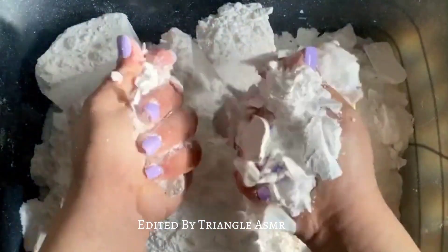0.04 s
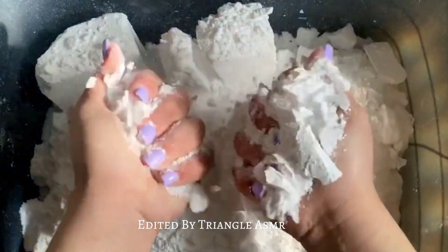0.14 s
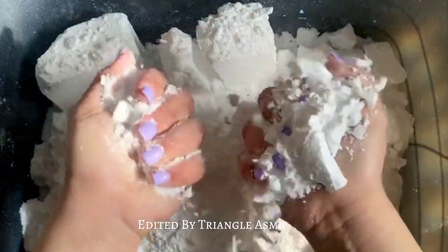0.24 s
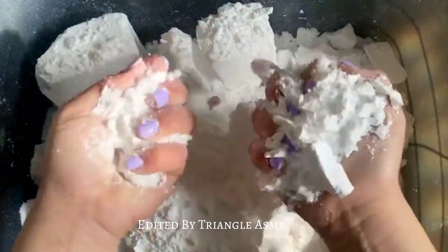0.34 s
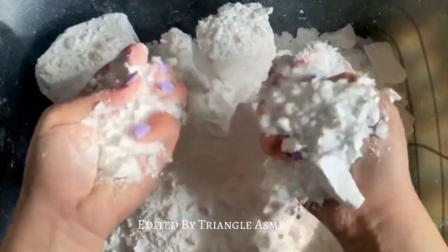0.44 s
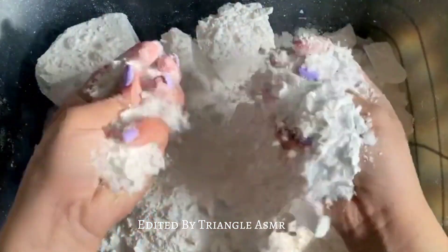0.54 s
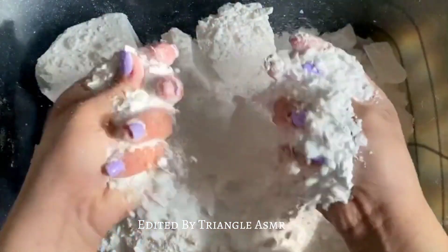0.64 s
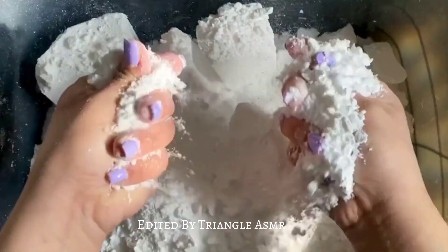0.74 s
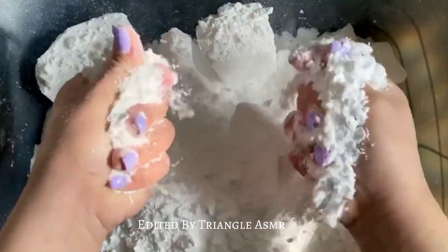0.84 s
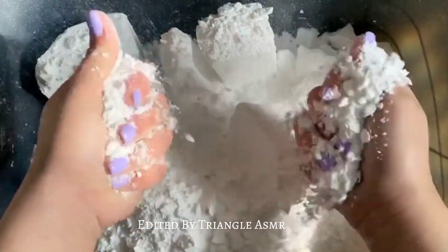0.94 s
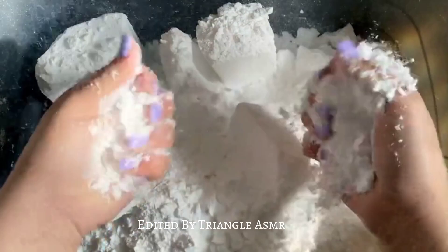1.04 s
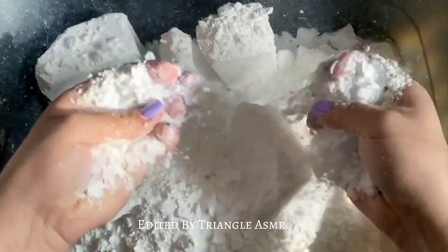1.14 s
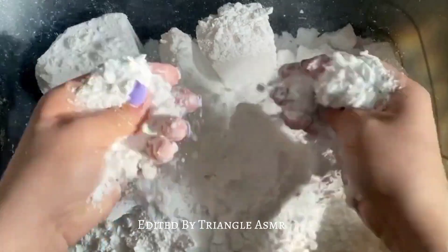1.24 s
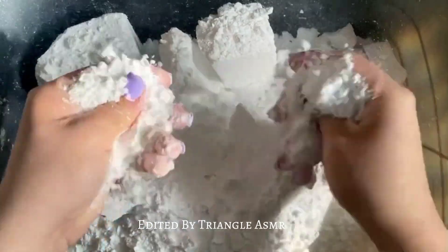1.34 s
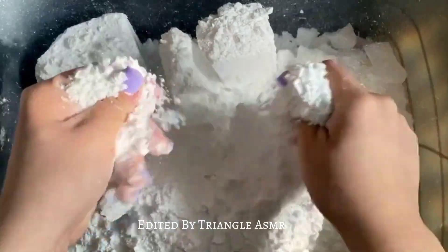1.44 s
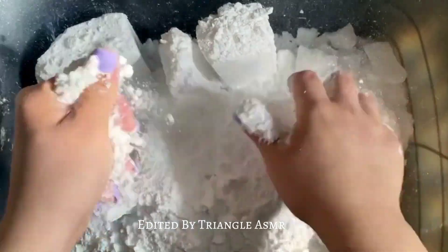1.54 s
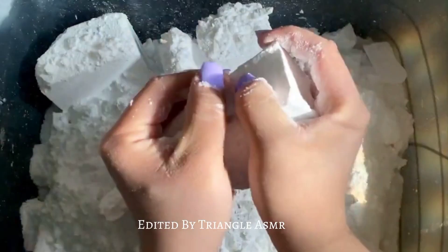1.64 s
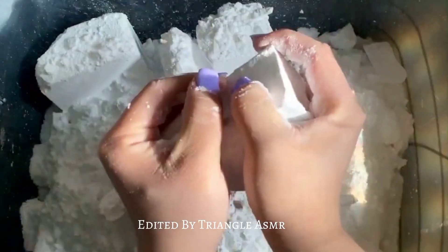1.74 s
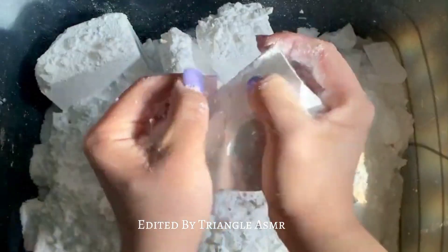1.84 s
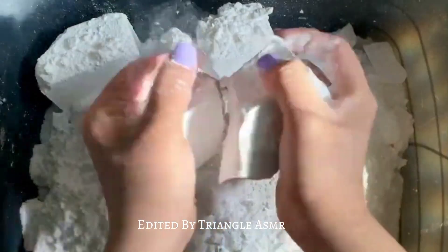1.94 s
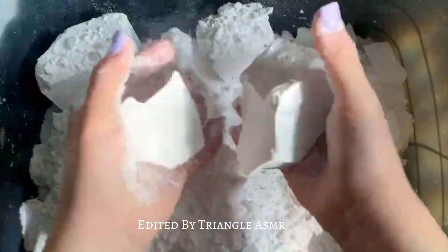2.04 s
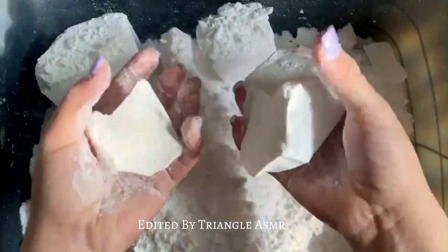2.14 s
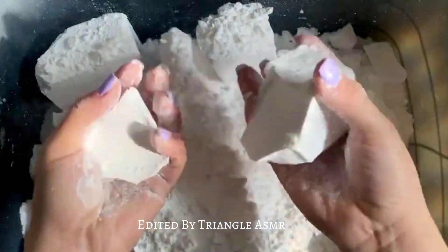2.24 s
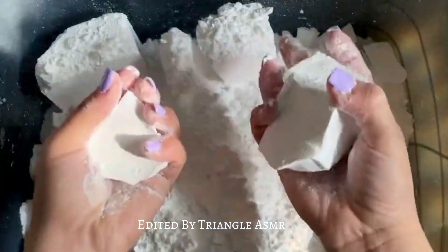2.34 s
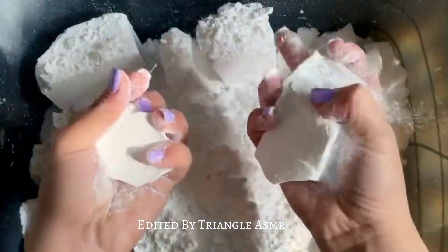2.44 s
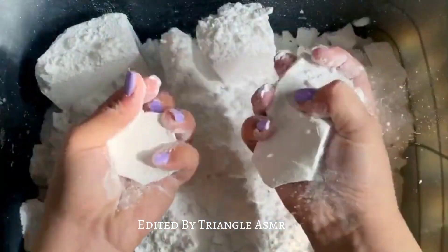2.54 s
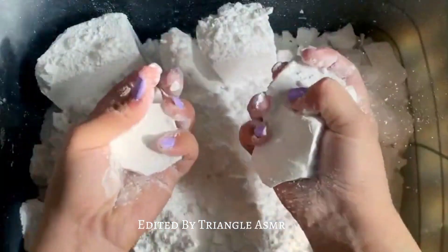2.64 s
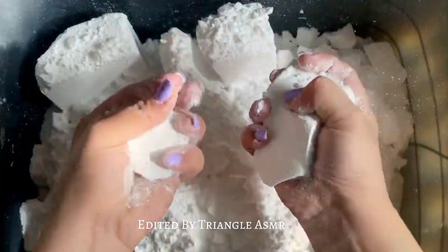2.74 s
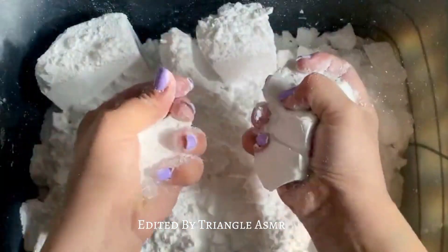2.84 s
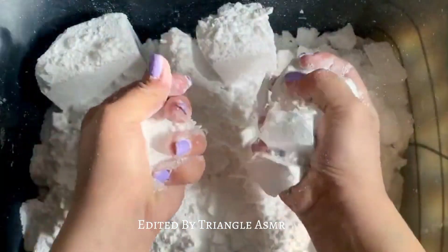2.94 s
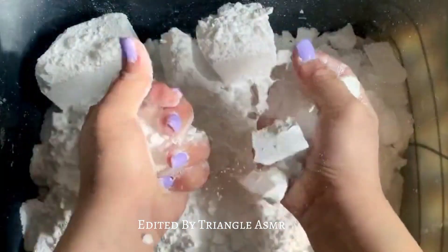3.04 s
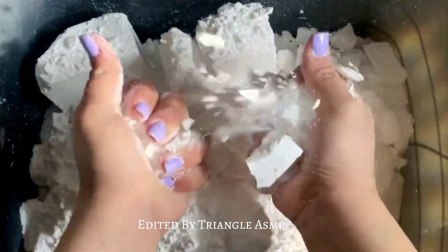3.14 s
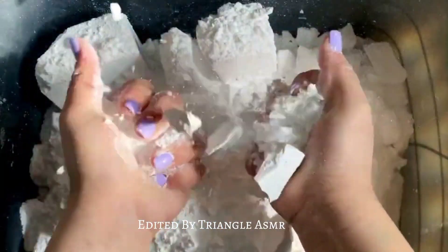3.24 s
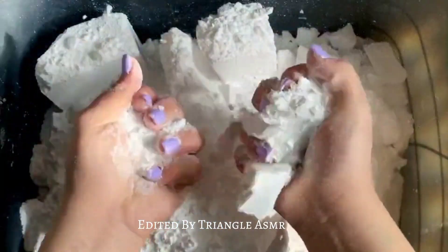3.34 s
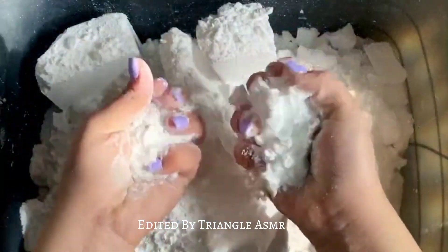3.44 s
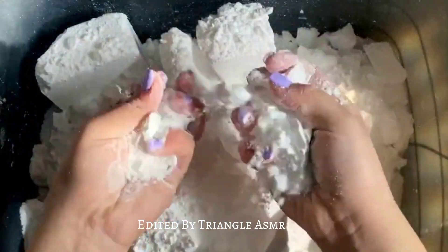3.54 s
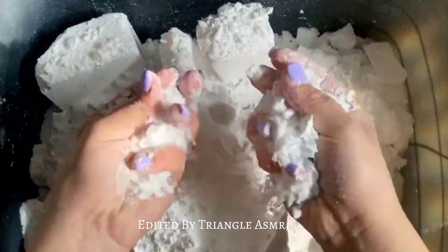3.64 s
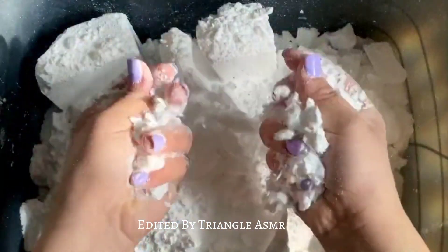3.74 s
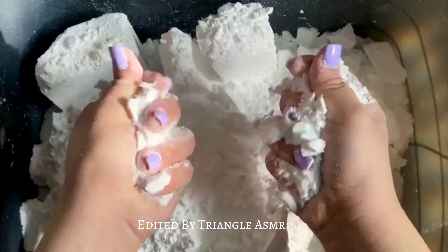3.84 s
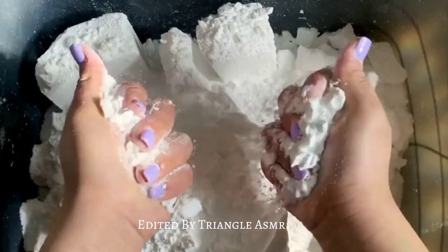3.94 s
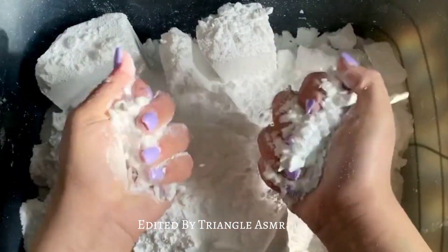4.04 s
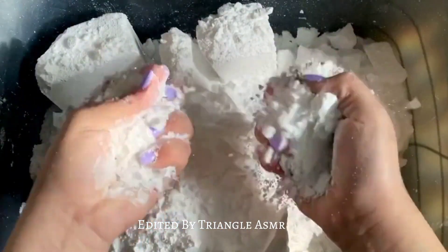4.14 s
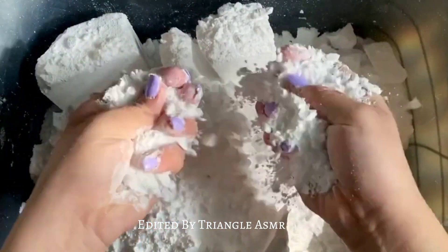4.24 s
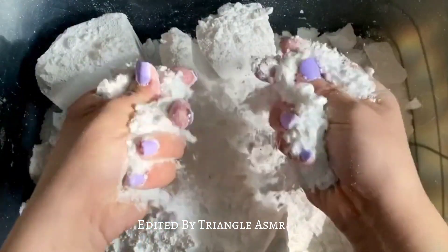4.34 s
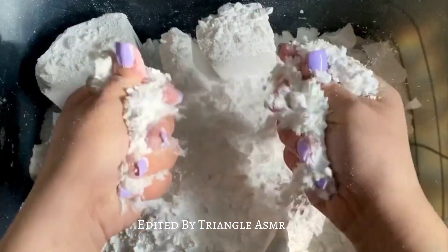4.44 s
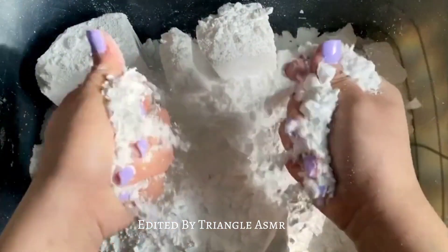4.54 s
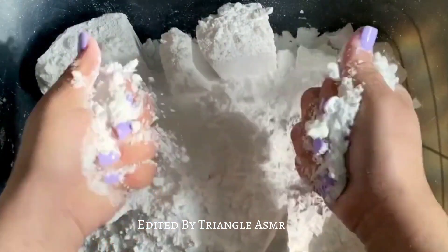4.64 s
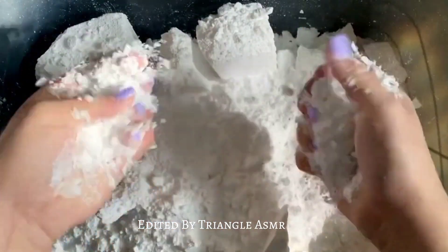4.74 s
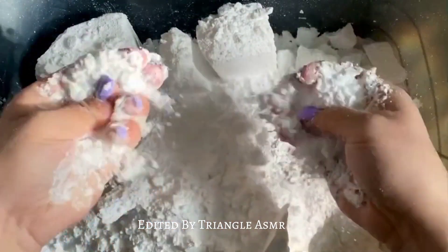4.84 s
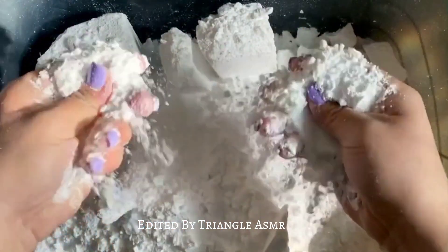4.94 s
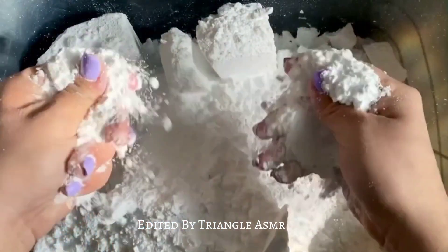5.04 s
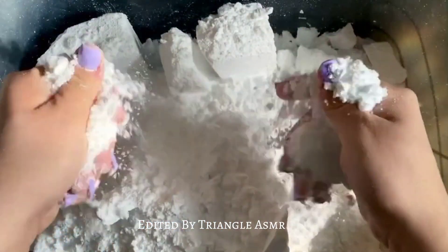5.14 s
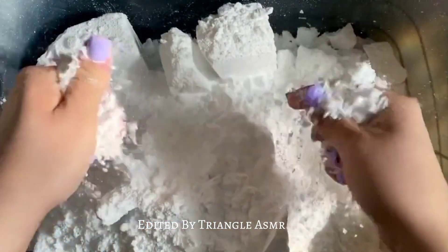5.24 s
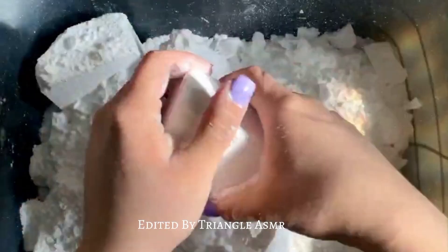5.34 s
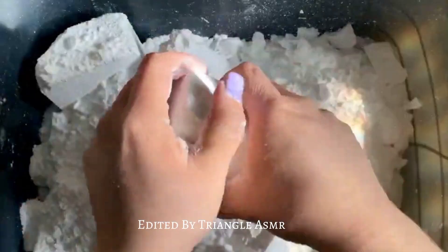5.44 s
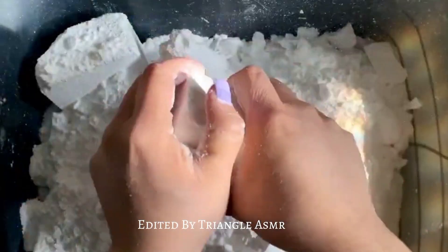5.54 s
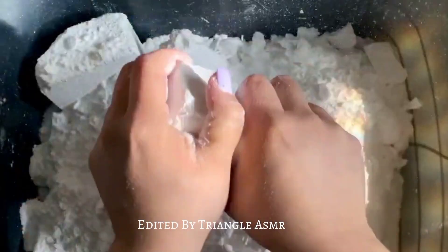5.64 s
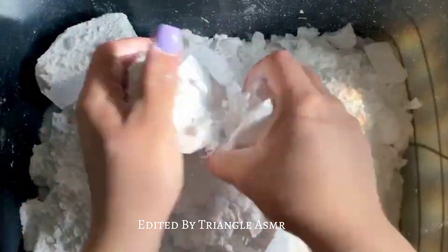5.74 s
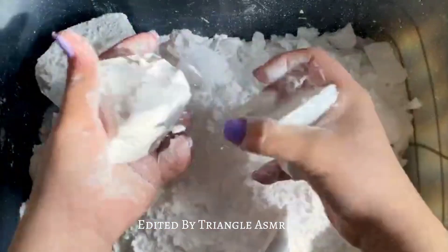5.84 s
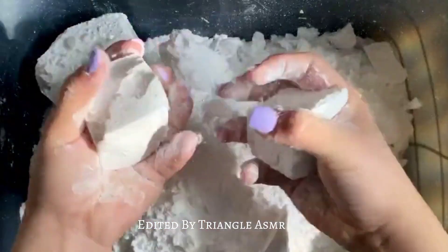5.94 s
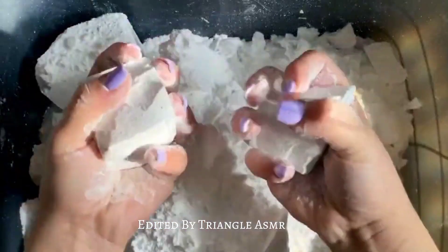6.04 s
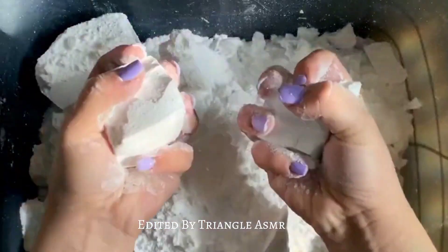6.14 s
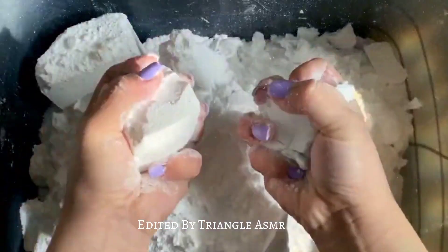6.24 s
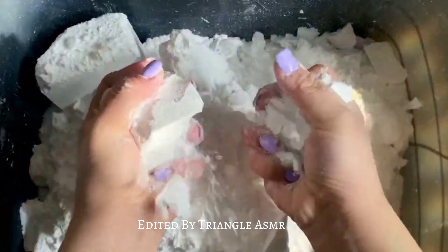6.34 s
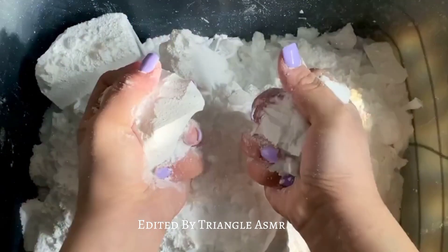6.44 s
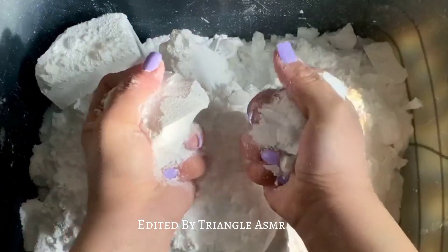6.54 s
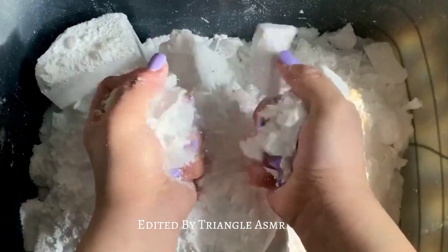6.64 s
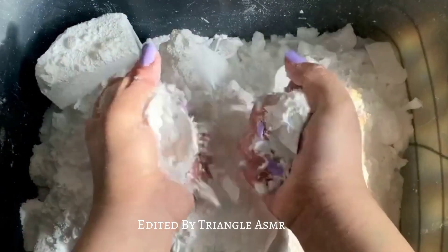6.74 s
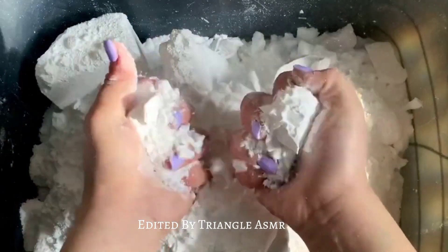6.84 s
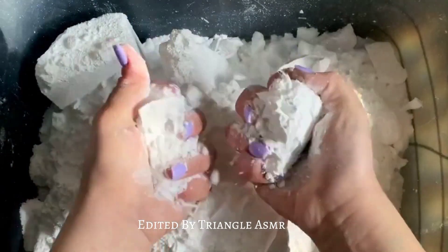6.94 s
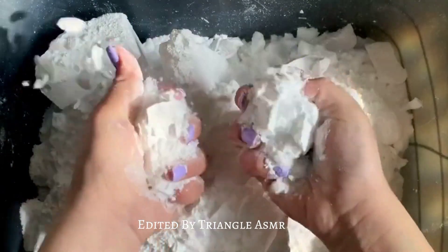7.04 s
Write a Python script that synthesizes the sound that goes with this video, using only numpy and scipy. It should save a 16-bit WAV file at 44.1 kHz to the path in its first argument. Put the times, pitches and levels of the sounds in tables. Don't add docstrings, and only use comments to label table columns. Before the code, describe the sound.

Already-crumbling chalk crunches at once, with fine powder hiss and dull lumps dropping into a tub. After a brief lull comes a hard snap, faint sliding dust, then heavy cracking that thins into gritty rubbing. A second sharp snap leads to another quiet handling moment and renewed crushing. Close, bright, dry sound with short room reflections, tiny contact clicks and a weak distant motor hum.

```python
import sys
import numpy as np
from scipy import signal
from scipy.fft import rfft, irfft
from scipy.io import wavfile
from scipy.ndimage import uniform_filter1d

SR = 44100
rng = np.random.default_rng(int(sys.argv[2]) if len(sys.argv) > 2 else 0)


def elevation(decibels):
    levels = np.asarray(decibels, float)
    return 10 ** (levels / 20)


def materialize(psi):
    bounded = np.clip(np.atleast_2d(psi).T, -1, 1)
    quanta = np.round(bounded * 32767).astype(np.int16)
    wavfile.write(sys.argv[1], SR, quanta)


N = 313110

MOTOR_HZ = 39.05
MOTOR_ORDERS = [(1, -48), (2, -70), (4, -62.5), (6, -70.5)]
# [f/Hz, level/dB per Hz]
AIR_SPECTRUM = [(5.9, -11), (10, 15.5), (40, -9.5), (63, -8.5), (102, -13), (156, -20), (207, -17),
                (306, -31.5), (432, -27), (500, -70), (650, -23), (1100, -120)]
AIR_DB = -46.5

# [f/Hz, T60/s]
ROOM_T60 = [(200, 0.064), (530, 0.45), (1390, 0.58), (3680, 0.3), (9700, 0.24)]
# [f/Hz, level/dB]
ROOM_COLOUR = [(200, 9), (400, 6.5), (700, 2.5), (1300, 0), (3000, 4), (4100, 2), (9000, 4.5),
               (15000, -0.5)]
ROOM_DB = -12.5

# [t/s, depth/dB]
DROPOUTS = [(2.446, -20), (2.4848, -30), (2.4998, -27), (2.506, -26), (2.5121, -10), (2.5182, -15.5),
            (2.5245, -17), (2.5922, -20), (2.6014, -19.5), (2.6152, -30), (2.6222, -23), (3.7162, -20.5),
            (3.7306, -21)]
DROPOUT_MS = 0.739
# [t/s, depth/dB, length/ms]
LONG_DROPOUT = [(2.4688, -34.5, 7.6)]
SCENE_CHANGES_S = [1.585, 5.334]
FADE_IN_S = .011

# [t/s, effort/dB, coarseness of what crumbles/dB]
HANDS = [(0, -54, 1), (.26, -56, 1.5), (.7, -53.5, 0.5), (1.0, -55, 0.5), (1.25, -59, 3.5),
         (1.58, -57, 1.5), (1.84, -56.5, -1.5), (2.05, -59.5, -4), (2.33, -58.5, -11), (2.56, -60.5, -2.5),
         (3.1, -53.5, 1.5), (3.9, -55, -0.5), (4.2, -58, 2.5), (4.749, -59, 4), (5.3, -59, -0.5),
         (5.671, -55, -10), (6.048, -57.5, -4), (7.1, -56.5, 5.5)]
# [t/s, extra effort/dB, length/s]
SQUEEZES = [(0.0, 5.5, 0.28), (0.516, 5, 0.22), (2.195, 2.5, .2), (2.446, 4.5, 0.25), (2.68, 9, 0.21),
            (2.867, 9, 0.24), (3.684, 3.5, 0.38), (4.207, 3.5, 0.25), (4.42, 2, 0.34), (5.025, 2, 0.5),
            (6.126, -2, 0.17), (6.253, 5, 0.28), (6.382, 1.5, 0.09), (6.584, 8, 0.37), (6.866, -3, 0.33),
            (7.1, -1, 0.34)]
SNAPS_S = [1.686, 5.4994]
STILL_DB = [-8, -1.5]
RESUME_S = 0.32
DEBRIS_DB = [-49, -49]
DEBRIS_T60_S = 0.38
# [f/Hz, level/dB per Hz]
HISS_SPECTRUM = [(3500, -8), (5000, -10.5), (6700, -8), (8800, -1.5), (10800, -3.5), (13500, 4), (15600, 5),
                 (17000, 8.5)]
GRIT_DB, GRIT_FOLLOWS, LUMP_DB, LUMP_FOLLOWS = -4, 0.91, -4, 0.59

# [t/s, length/s, level/dB, centre f/Hz]
SLIDES = [(1.835, 0.026, -60, 13000), (1.89, 0.029, -63, 12700), (1.952, .17, -65, 7350),
          (1.975, 0.1, -64, 14000), (2.09, 0.05, -59, 15000), (2.094, 0.077, -66, 7640),
          (2.21, 0.057, -57, 9800), (5.68, .04, -68, 9000), (5.725, 0.057, -52, 14000),
          (5.73, 0.064, -64, 6050), (5.798, .05, -56, 14000), (5.891, 0.026, -45, 14000),
          (1.97, .06, -67, 8600), (2.2, .09, -54, 15200), (2.19, .08, -62, 14000), (2.012, .04, -60, 7500),
          (2.096, 0.046, -64, 10200), (5.685, .06, -60, 12500)]
# [t/s, peak level/dB, f/Hz]
CHIPS = [(.469, -40.5, 7900), (.598, -42, 6340), (.598, -42, 12570), (1.96, -58, 7500), (3.445, -49, 6800),
         (5.356, -48, 8790), (5.643, -47, 4200), (5.655, -43.5, 9700), (5.984, -38.5, 8700),
         (5.985, -44, 4000), (6.989, -45, 3300), (6.723, -38, 3310), (6.985, -39.5, 10300),
         (7.092, -44, 9600)]
CHIP_T60_S = .024
# [t/s, peak level/dB, f/Hz]
KNOCKS = [(.298, -35, 2100), (1.324, -36, 1200), (1.3524, -40, 1040), (1.452, -41, 2200),
          (2.9391, -17.5, 2220), (3.116, -35, 2430), (4.2036, -43.5, 2500), (4.482, -48, 1350),
          (4.67, -32.5, 1580), (4.8609, -44, 2300), (5.15, -54, 1640), (6.065, -48, 2650),
          (6.812, -38, 1430), (7.02, -39, 1100), (7.056, -27.5, 1910)]
KNOCK_CYCLES = 4.9
# [t/s, peak level/dB, f/Hz]
THUDS = [(0.059, -28.5, 750), (0.087, -32.5, 378), (0.13, -30.5, 402), (0.158, -36.5, 410),
         (0.247, -50, 310), (0.327, -46, 667), (0.551, -40, 330), (0.607, -39.5, 242), (3.415, -47, 280),
         (3.566, -49, 674), (3.654, -52, 270), (3.846, -43, 372), (3.871, -41, 770), (3.944, -50, 484),
         (4.48, -36.5, 465), (6.061, -56, 250), (6.248, -52, 392), (6.622, -32, 570), (6.804, -51, 284)]
THUD_DELAY_S = .002

# [t/s, length/ms, level/dB, lowest f/Hz]
TEARS = [(1.828, 38, -56.5, 8000), (1.885, 48, -59.5, 7000), (1.94, 90, -62, 7000), (2.072, 81, -60, 7100),
         (2.15, 50, -58, 8000), (2.194, 74, -56.5, 5040), (2.323, 16, -46, 5000), (2.336, 8.1, -29.5, 2000),
         (2.345, 26, -42, 3000), (2.646, 14, -47, 2500), (2.670, 5, -38.5, 800), (2.701, 17, -45, 3000),
         (2.724, 3.9, -38.5, 2000), (2.771, 18, -46, 7000), (2.815, 5.1, -44, 1500), (2.831, 8, -33, 1480),
         (3.019, 14, -27, 2500), (5.5, 28, -37, 1500), (5.66, 35, -57, 6000), (5.71, 54, -58, 5000),
         (5.781, 33, -56, 5000), (5.885, 22, -53, 4500), (5.975, 16, -57, 1000), (6.061, 14, -53.5, 1000),
         (6.471, 9.8, -31.5, 700), (6.487, 19, -37, 800), (6.505, 57, -45, 497), (6.565, 8.8, -41, 5000),
         (6.576, 29, -43.5, 600)]
TEAR_SPREAD_DB, TEAR_RISE = 6.5, 0.2
EVEN_AFTER_MS, TEAR_SPAN = 20, 11

BREAK_S = [1.686, 1.6863, 3.0201, 5.4994, 6.4705, 6.4706, 6.5752]
# [peak level/dB, body f/Hz, ring/cycles]
BREAKS = [(-17.5, 640, 1), (-2.5, 2300, 0.46), (-26, 1500, 1), (-15.5, 620, 0.57), (-31, 790, 0.95),
          (-9, 1500, 0.95), (-20.5, 830, 0.65)]
# [lag/ms], [level/dB]
TUB_ECHO_MS = [.9, 0.95]
TUB_ECHO_DB = [-7.5, -3.5]

# [lowest f/Hz, highest f/Hz, burst decay/ms, ragged share]
CRACK_PARTS = [
    (165, 1360, 1, 0.039),
    (1084, 4150, 0.17, 0.3),
    (3670, 14400, 0.23, 0.48),
]
FACING = (1, -1, 1)
TUB_SHARE, TUB_MS = 0.14, 5.5
MAIN_S = [1.6863, 2.3384, 2.671, 2.8179, 2.8322, 3.0067, 3.0202, 4.002, 5.4998, 5.5111, 6.1465, 6.4218,
          6.4708, 6.4898]
# [thump level/dB, crunch level/dB, snap level/dB]
MAIN_CRACKS = [(-14.5, -9, -2), (-28, -22.5, -12), (-24, -28, -20), (-26, -31, -25), (-22, -30, -24),
               (-18, -10, -8.5), (-15.5, -7.5, -42), (-30.5, -22, -30), (-22, -9.5, -1.5), (-42, -11.5, -6),
               (-32.5, -32, -25.5), (-23, -15, -16.5), (-18.5, -12.5, -5), (-38, -17, -27)]
# [t/s, peak level/dB, sharpness/octaves above
# 2 kHz]
FRACTURES = [(.041, -25, 3), (.0521, -26, -1), (.0662, -29.5, 1.5), (.1128, -25.5, 1.4),
             (.218, -25, 2.5), (.3206, -28, 2), (.4477, -40, -2), (.4799, -28, 1.3),
             (.5171, -20.5, 2.3), (.6541, -32.5, -5), (.6797, -32, 1), (.7355, -23, 7), (.9415, -30, 1),
             (.9858, -27, .6), (1.2056, -25.5, 9), (1.2411, -30, 4), (1.324, -38.5, -9),
             (1.3524, -34, -3.5), (1.43, -33.5, 0.5), (1.549, -37, -3.5), (0.089, -34, 0),
             (.132, -40, -4), (.607, -52, 3), (.0185, -39, 4), (.262, -29, 1.5), (.4704, -39, -2),
             (.8272, -42, 0), (.9342, -28.5, 6), (1.0077, -37, 1),
             (2.232, -22.5, 2), (2.3108, -27.5, 1.5), (2.329, -32, 1.5), (2.3329, -25, 2),
                (2.3498, -25, 1), (2.4817, -29, -1.5), (2.6405, -18.5, 1.7), (2.6545, -21, 10),
                (2.6993, -14, 2.5), (2.7264, -25, 1.5), (2.73, -34, 1), (2.757, -25, 6), (2.771, -22, -4),
                (2.8715, -33, 5), (2.88, -28, 6), (2.8267, -14, 3), (2.8336, -13, 0.5), (2.8839, -18, 0.8),
                (2.8945, -25, -6), (2.896, -16, 2.5), (2.915, -34, -1), (2.921, -20, 10),
                (2.9393, -17, 1.1), (3.0206, -15, 11), (3.0362, -40, -7), (2.9887, -32, 5),
                (3.0584, -28, 6), (3.1165, -12, 1.6), (3.128, -19.5, 9), (3.2074, -20.5, 3),
             (3.0664, -22, 9), (3.1468, -28, -0.3), (3.2108, -26, 5), (3.217, -25.5, 2.3),
                  (3.2605, -25.5, 0), (3.2966, -28.5, 4), (3.3174, -20, 1.4), (3.3718, -28, 0.7),
                  (3.3833, -27.5, 0.5), (3.4384, -26, 1.3), (3.4973, -27, 0.5), (3.5235, -31, 1),
                  (3.549, -20.5, 1.4), (3.5615, -27, 7), (3.6668, -21, 2), (3.6863, -22, 3),
                  (3.7134, -34, -13), (3.7896, -29, 6), (3.829, -19, 1.8), (3.837, -16, 1.5),
                  (3.9312, -28.5, 1.9), (4.0106, -25, 2.5), (4.0775, -28, 1.5), (4.1, -24.5, 2.5),
                  (4.3436, -37, 4.5), (4.668, -35, -7), (4.7388, -30, 0.4), (4.8982, -33, 1),
                  (5.2728, -31.5, 1.8),
             (5.345, -31.5, 2), (5.491, -39, 9), (5.891, -44, 3.4), (5.9446, -20, 2.5), (5.983, -21, 5),
               (6.1785, -25.5, 1.5), (6.215, -33, 3), (6.2228, -12, 2.04), (6.2342, -25, 9),
               (6.2827, -18.5, 2.7), (6.3166, -25, 8), (6.568, -31, -3), (6.066, -38, 0), (6.632, -34, -1),
               (6.4928, -14, 1), (6.5023, -26, -0.5), (6.5545, -19.5, 1.3), (6.5756, -7.5, 1.5),
               (6.583, -24, 5), (6.6125, -35, 0), (6.666, -24.5, 2), (6.6907, -22, 1.5),
               (6.7205, -24.5, 1.5), (6.8793, -20, 1.1), (6.8978, -29.5, 11), (6.927, -25, 1.5),
               (6.9868, -22, 0.4), (7.0494, -25, 0.5)]
# [t/s, peak level/dB, sharpness/octaves above 2 kHz]
TICKS = [(0.0057, -33, 8), (0.0184, -35, 6), (0.0546, -30, 2), (0.0627, -31, -1.5), (0.0827, -32, 7),
         (0.099, -36, 0), (0.1054, -31, 1.5), (0.1254, -36, 4), (0.3004, -33, 0.2), (0.3275, -32, 1),
         (0.386, -41, 3), (0.4005, -44, 0), (0.4344, -35, 5), (0.447, -31, 2), (0.4704, -27, 0),
         (0.5596, -30, 2.5), (0.6575, -40, 2.6), (0.6793, -30, 3), (0.718, -37, 1.9),
         (0.7208, -38, 4), (0.7353, -37, 7), (0.786, -33.5, 1.5), (0.8114, -31, 6), (0.827, -39, 0.8),
         (0.9513, -33, 1.5), (1.0075, -40, -1), (1.1338, -33, 4), (1.2622, -34.5, 0.5),
         (2.314, -39, 0), (2.3264, -33, 2.1), (2.3412, -21, 3.5), (2.4247, -29, 5),
         (2.6305, -34, 2.4), (2.6502, -44, -1), (2.673, -30, -1), (2.6986, -20, 2),
         (2.703, -33, -0.5), (2.7062, -32, 2.4), (2.7087, -28, 1), (2.722, -34, 2.0),
         (2.729, -29, 1.7), (2.7352, -35, 1.7), (2.757, -42, -1), (2.7774, -43, 2.8),
         (2.7869, -38, 2.9), (2.8198, -33, 5), (2.8483, -24, 4), (2.8715, -30, 1.6),
         (2.8932, -25, -0.4), (2.9142, -27, 5), (2.9631, -39, 1.6), (3.036, -16, 8), (3.0759, -26, 4),
         (3.0785, -33, 1.0), (3.0883, -28, 6), (3.0924, -34, 3), (3.2109, -28, -0.5),
         (3.2822, -39, 1), (3.3396, -27, 1.8), (3.3477, -32, 0.5),
         (3.4903, -33, 2.2), (3.5389, -27, 2), (3.5684, -31, 0.7), (3.5815, -30, 4),
              (3.6125, -26, 2.2), (3.6257, -31, 1.2), (3.6534, -28, 0.5), (3.6978, -27, 1),
              (3.7366, -34, 5), (3.7467, -32, 5), (3.7529, -30, 5), (3.763, -35, 2.0), (3.789, -30, 2.8),
              (3.8173, -37, 0.2), (3.8252, -40, 1), (3.8341, -34, 4), (3.9091, -35, 16), (3.9213, -41, 4),
              (3.9437, -27.5, 3.5), (4.0153, -36, 0.5), (4.2047, -33, 1), (4.3376, -29.5, 1.5),
              (4.343, -33, 2.5), (4.372, -37, 2), (4.5664, -39, 13), (4.6057, -46, -4.5), (4.796, -35, 1.5),
              (4.8604, -31, 0.5), (4.9102, -36, 1.1), (5.022, -44, 7), (5.0376, -34, 2.7), (5.1507, -39, 0),
              (5.1616, -40, -0.1), (5.183, -38, 1), (5.244, -44, 2.9), (5.268, -34, 0.7), (5.4896, -39, 4),
              (5.6557, -37, 4), (5.7576, -34, 1.5), (5.7815, -39, 3.9), (5.8903, -46, 7),
              (5.9793, -37.5, -1.8), (5.9847, -34, -0.5), (6.0972, -36, 7), (6.183, -22.5, 2.2),
              (6.2078, -35, 2.2), (6.2534, -35, 5), (6.28, -34, 3), (6.3245, -35, 2.2), (6.3683, -39, 0.5),
              (6.383, -41, 1.8), (6.404, -40, 1.7), (6.5214, -37, -1.5), (6.5826, -30, -1),
              (6.6126, -27, 4), (6.9191, -37, 2.5), (6.967, -46, -0.5), (6.9748, -42, 6), (7.0113, -29, 1),
              (7.0722, -33, 5)]
BELOW_FALL_DB, ABOVE_FALL_DB = 2, 2.5

PORT_LOW_HZ, PORT_HIGH_HZ, PORT_DB = 12960, 14800, -9
CLIP_TOP = .62
SHELF_HZ, SHELF_DB, SHELF_GATE_DB, CUTOFF_HZ = 15580, -18, -62, 16700


def rms_one(x):
    return x / np.sqrt(np.mean(x ** 2) + 1e-20)


def at_hz(points, hz):
    point_hz, value = np.transpose(points)
    return np.interp(np.log(hz), np.log(point_hz), value)


def band(x, low_hz, high_hz):
    edges = [low_hz, min(high_hz, .45 * SR)]
    return signal.sosfilt(signal.butter(2, edges, "band", fs=SR, output="sos"), x)


def coloured(x, spectrum):
    hz = np.maximum(np.arange(N // 2 + 1) * SR / N, 1)
    return rms_one(irfft(rfft(x) * elevation(at_hz(spectrum, hz)), N))


def drift(rate):
    r = np.exp(-80 * np.pi * rate / SR)
    noise = rng.standard_normal(N // 40 + 2002)
    slow = signal.lfilter([1], [1, -2 * r, r * r], noise)[2000:]
    return np.interp(np.arange(N) / 40, np.arange(len(slow)), rms_one(slow))


def add(out, s, piece):
    i = int(round(s * SR))
    out[i:i + len(piece)] += piece[:N - i]


def ring(x, hz, t60):
    r, w = elevation(-60 / (t60 * SR)), 2 * np.pi * hz / SR
    return signal.lfilter([0, np.sin(w)], [1, -2 * r * np.cos(w), r * r], x + 1e-18)


def hum():
    turn = 2 * np.pi * np.cumsum(MOTOR_HZ + 0.1195 * drift(0.567)) / SR
    lines = np.zeros(N)
    for order, db in MOTOR_ORDERS:
        waver_db = 1.5 * drift(2.4)
        lines += elevation(db + waver_db) * np.sqrt(2) * np.sin(order * turn)
    return lines + elevation(AIR_DB) * coloured(rng.standard_normal(N), AIR_SPECTRUM)


def room(x):
    t, edges = np.arange(int(.7 * SR)) / SR, 150 * 2 ** np.arange(0, 7, .5)
    white, tail = rng.standard_normal((2, len(t))), 0
    for k, (low, high) in enumerate(zip(edges, edges[1:])):
        hz = np.sqrt(low * high)
        decay_db = at_hz(ROOM_COLOUR, hz) - 60 * t / at_hz(ROOM_T60, hz)
        tail = tail + band(white[k % 2], low, high) * elevation(decay_db)
    tail = tail * (1 - np.exp(-t / 0.00035))
    echo = elevation(ROOM_DB) * tail / np.sqrt(np.sum(tail ** 2))
    return signal.fftconvolve(x, echo)[:N]


def dropouts():
    out = np.zeros(N)
    for s, depth_db, length_ms in [(s, db, DROPOUT_MS) for s, db in DROPOUTS] + LONG_DROPOUT:
        size = int(round(length_ms * SR / 1000)) + 1
        grit = 0.049 * rng.standard_normal(300)[:size]
        add(out, s, -elevation(depth_db) * (1 + grit))
    return out


def effort():
    t, (s, effort_db, coarse_db) = np.arange(0, N + 64, 64) / SR, np.transpose(HANDS)
    effort_db = np.interp(t, s, effort_db)
    for s0, extra_db, length_s in SQUEEZES:
        effort_db += extra_db * np.cos(np.pi * np.clip((t - s0) / length_s, -.5, .5)) ** 2
    for change_s, snap_s, still_db in zip(SCENE_CHANGES_S, SNAPS_S, STILL_DB):
        effort_db += still_db * (t > change_s) * np.clip(1 - (t - snap_s) / RESUME_S, 0, 1)
    every = np.arange(N) / SR
    return np.interp(every, t, effort_db), np.interp(every, s, coarse_db)


def grains(per_s, spread_db, clump_db, patchy_db, low_hz, high_hz, cycles, rustle):
    sizes = elevation(spread_db * np.minimum(rng.exponential(1, N), 4)) * rng.choice([-1, 1], N)
    born = rng.random(N) < per_s * elevation(clump_db * drift(25)) / SR
    clicks, dust = rms_one(sizes * born), rng.standard_normal(N)
    swell_db = 0.86 * clump_db * drift(11.0)
    dealt, out = rng.integers(0, 10, N), 0
    for k, hz in enumerate(np.geomspace(low_hz, high_hz, 10)):
        patch = rustle * np.roll(dust, k * N // 10) * elevation(swell_db + patchy_db * drift(22))
        out = out + ring(clicks * (dealt == k) + patch, hz, cycles / hz)
    return rms_one(out)


def crumbling():
    t, (hiss_db, coarse_db) = np.arange(N) / SR, effort()
    debris = np.zeros(N)
    for s, db in zip(SNAPS_S, DEBRIS_DB):
        debris += (t > s) * elevation(db - 60 * np.abs(t - s) / DEBRIS_T60_S)
    rub_db = hiss_db + GRIT_DB + GRIT_FOLLOWS * coarse_db
    lump_db = hiss_db + LUMP_DB + LUMP_FOLLOWS * coarse_db
    gritty = elevation(np.clip(rub_db - hiss_db + 4.0, -14, 3))
    powder = grains(2000.0 * gritty, 7.8, 2.7, 3., 4820, 16400, cycles=11.1, rustle=0.52)
    hiss = coloured(powder, HISS_SPECTRUM)
    rub = grains(780.0 * gritty, 3.2, 3.0, 1.0, 1490, 5900, cycles=4.2, rustle=0.24)
    lumps = grains(300., 3.2, 2.7, 2.5, 358, 1430, cycles=4.5, rustle=0.2)
    kneaded = elevation(hiss_db + 3.0) * hiss + elevation(rub_db - 2.5) * rub + elevation(lump_db - 2.0) * lumps
    return kneaded + debris * (rub + 3.1 * lumps)


def slides():
    out = np.zeros(N)
    for (s, length_s, level_db, hz), noise in zip(SLIDES, rng.standard_normal((len(SLIDES), 8000))):
        swell = np.hanning(int(length_s * SR))
        hiss = rms_one(band(noise, .97 * hz, 1.03 * hz))[-len(swell):]
        add(out, s - length_s / 2, elevation(level_db) * swell * hiss)
    return out


def chips():
    out, click = np.zeros(N), np.arange(3000) == 0
    for s, peak_db, hz in CHIPS:
        add(out, s, elevation(peak_db) * ring(click, hz, CHIP_T60_S))
    for s, peak_db, hz in KNOCKS:
        add(out, s, elevation(peak_db) * ring(click, hz, KNOCK_CYCLES / hz))
    return out


def thuds():
    out, t = np.zeros(N), np.arange(1500) / SR
    for s, peak_db, hz in THUDS:
        wall = np.sin(2 * np.pi * hz * t) + 0.81 * np.sin(2 * np.pi * 1.744 * hz * t)
        envelope = np.exp(-t * hz / 1.12) * (1 - np.exp(-t / 0.0002))
        add(out, s + THUD_DELAY_S, -elevation(peak_db + 0.5) * wall * envelope)
    return out


def tears():
    out, size = np.zeros(N), 4500
    noise = rng.standard_normal((40, size))
    sizes = np.repeat(rng.exponential(1, (40, size // 12)), 12, axis=1)
    for (s, length_ms, level_db, low_hz), dust, big in zip(TEARS, noise, np.minimum(sizes, 3)):
        done = np.arange(size) / SR / length_ms * 1000
        swell = np.clip(np.minimum(done / TEAR_RISE, (1 - done) / (1 - TEAR_RISE)), 0, 1) ** 0.89
        uneven_db = TEAR_SPREAD_DB * min(1, (EVEN_AFTER_MS / length_ms) ** 2)
        piece = band(swell * dust * elevation(uneven_db * big), low_hz, TEAR_SPAN * low_hz)
        add(out, s, elevation(level_db) * piece / np.sqrt(np.sum(piece ** 2) / np.sum(swell > 0)))
    return out


def breaks():
    out, t = np.zeros(N), np.arange(800) / SR
    for s, (peak_db, hz, cycles) in zip(BREAK_S, BREAKS):
        add(out, s, elevation(peak_db + 1.0) * np.sin(2 * np.pi * hz * t) * np.exp(-t * hz / cycles))
    return out


def tub_echo(direct):
    out = np.zeros(N)
    for s, lag_ms, level_db in zip(SNAPS_S, TUB_ECHO_MS, TUB_ECHO_DB):
        first = direct[int(s * SR):int(s * SR) + 200] * (np.arange(200) < 36)
        add(out, s + lag_ms / 1000, -elevation(level_db) * band(first, 172, 7500))
    return out


def parts_db(top_db, sharpness):
    octaves = np.array([-2, 0, 2])
    fall_db = np.where(octaves < sharpness, BELOW_FALL_DB, ABOVE_FALL_DB) * (octaves - sharpness) ** 2
    return top_db - fall_db + fall_db.min()


def cracks():
    near, spread, t = np.zeros(N), np.zeros(N), np.arange(900) / SR
    minor = FRACTURES + TICKS
    rows = list(zip(MAIN_S, MAIN_CRACKS)) + [(s, parts_db(top_db, sharp)) for s, top_db, sharp in minor]
    noise = rng.standard_normal((260, len(t)))
    for k, (low_hz, high_hz, decay_ms, ragged) in enumerate(CRACK_PARTS):
        push = band(1. * (t == 0), low_hz, high_hz)
        fading = np.exp(-1000 * t / decay_ms) + TUB_SHARE * np.exp(-1000 * t / TUB_MS)
        pieces = push + band(ragged * noise * fading, low_hz, high_hz)
        pieces /= np.abs(signal.hilbert(pieces)).max(axis=1)[:, None]
        for (s, peaks_db), piece in zip(rows, pieces):
            piece = elevation(peaks_db[k] - 2.0) * piece
            add(near, s, piece)
            same_energy = np.sqrt(np.sum(piece ** 2) / np.sum(push ** 2))
            add(spread, s, FACING[k] * push * same_energy)
    return near, spread


def scene():
    near, spread = cracks()
    jolts, lumps, torn = breaks(), thuds(), tears()
    direct = near + jolts
    echoed = room(spread + jolts + 1.4 * lumps + 0.97 * torn)
    blows = direct + tub_echo(direct) + lumps + torn + echoed
    blows = blows + elevation(PORT_DB) * band(blows, PORT_LOW_HZ, PORT_HIGH_HZ)
    return (blows + chips() + slides() + crumbling() + hum())[None]


def roll_off(x):
    return signal.sosfilt(signal.butter(12, 16640, fs=SR, output="sos"), x)


def record(dry):
    t, x = np.arange(N) / SR, CLIP_TOP * np.tanh(dry / CLIP_TOP) + dropouts()
    for s in SCENE_CHANGES_S:
        x = x * np.where(t > s, np.clip((t - s) / FADE_IN_S, 0, 1), 1)
    hz, spectrum = np.arange(N // 2 + 1) * SR / N, rfft(x)
    top = elevation(SHELF_DB) * irfft(spectrum * (hz >= SHELF_HZ) * (hz < CUTOFF_HZ), N)
    loud = uniform_filter1d(top ** 2, size=256) > elevation(2 * SHELF_GATE_DB)
    gate = uniform_filter1d(1. * loud, size=256)
    mix = irfft(spectrum * (hz < SHELF_HZ), N) + top * gate
    return roll_off(mix)


dry = scene()
out = record(dry)
materialize(out)
```